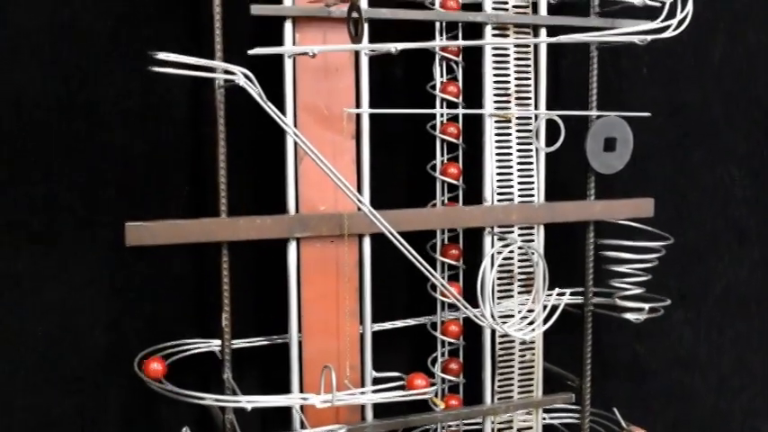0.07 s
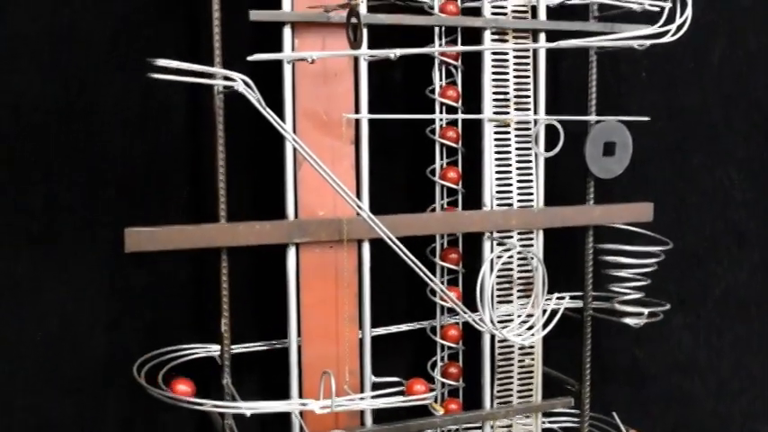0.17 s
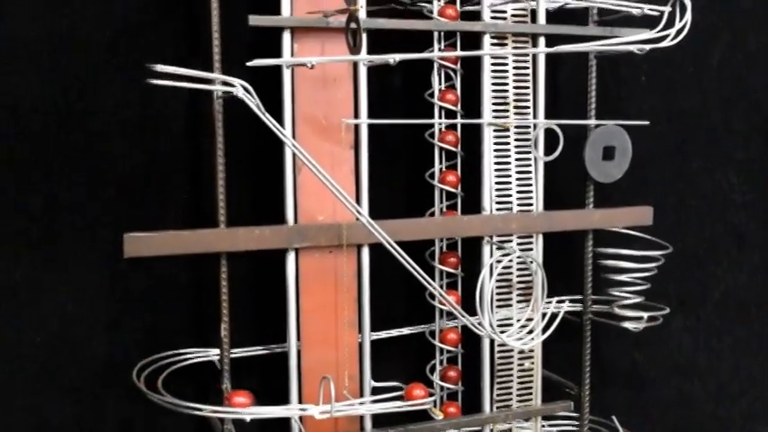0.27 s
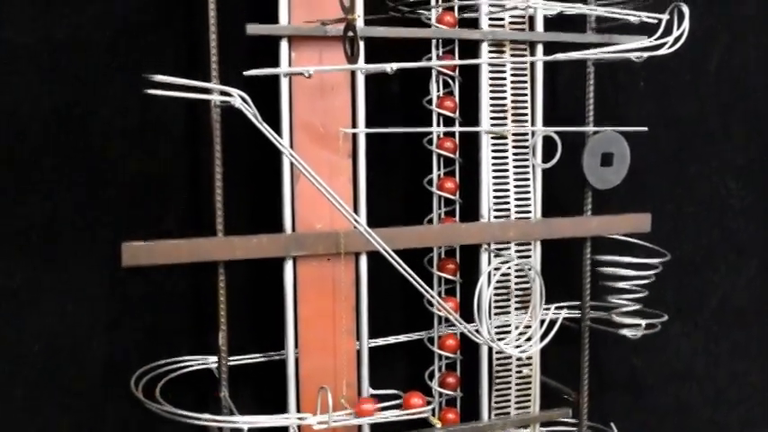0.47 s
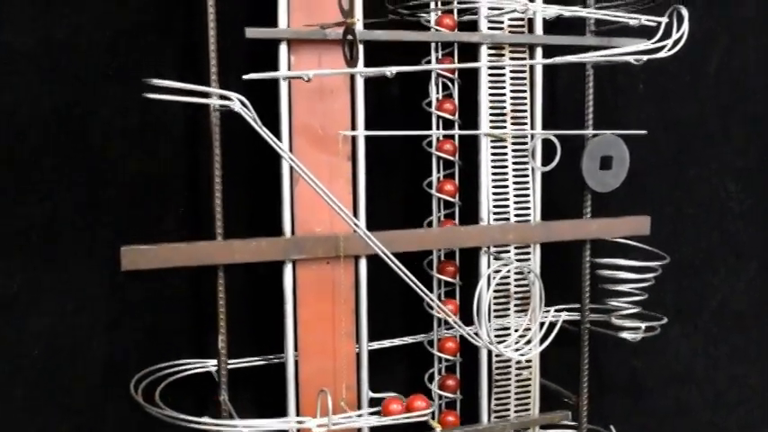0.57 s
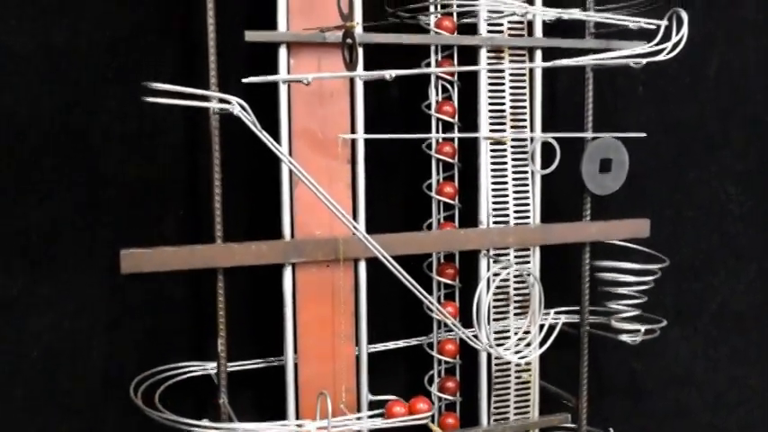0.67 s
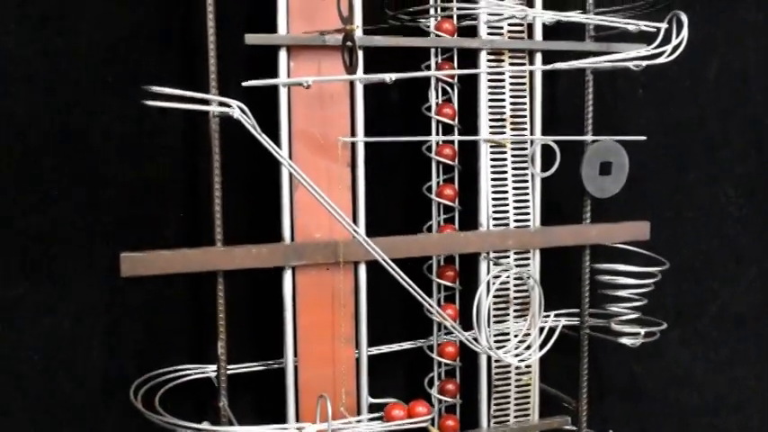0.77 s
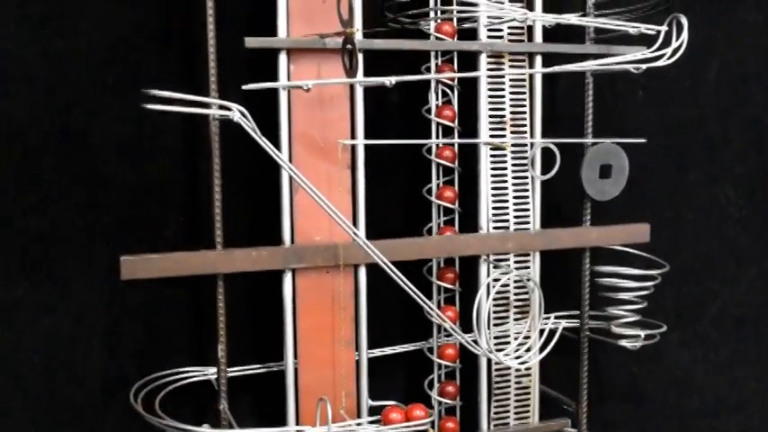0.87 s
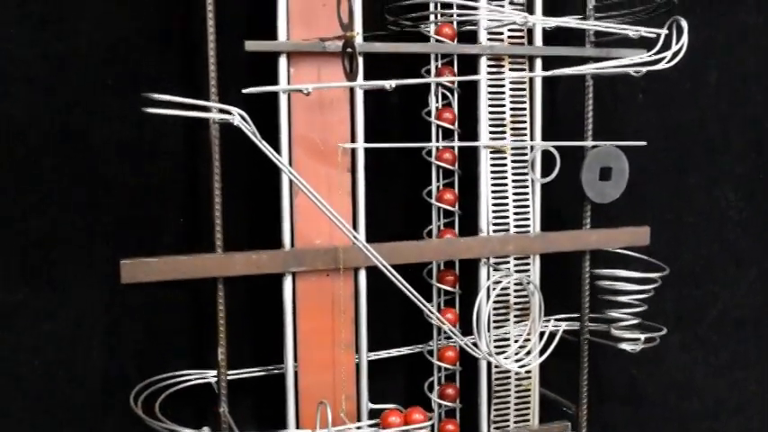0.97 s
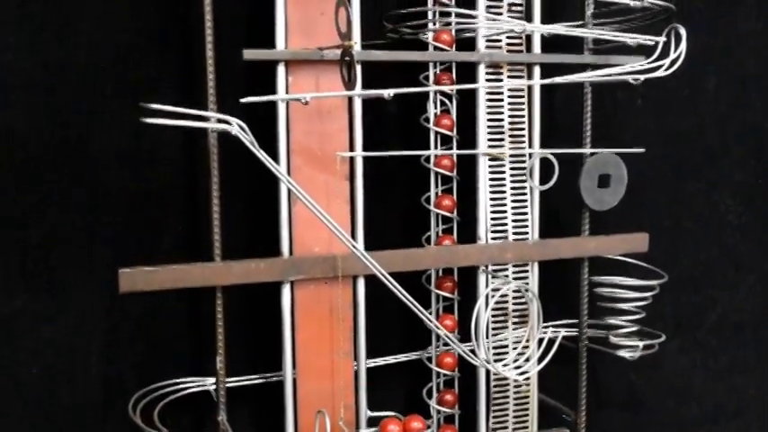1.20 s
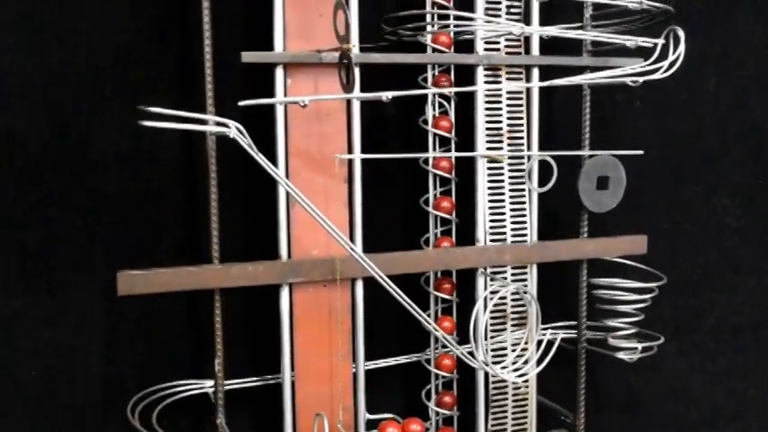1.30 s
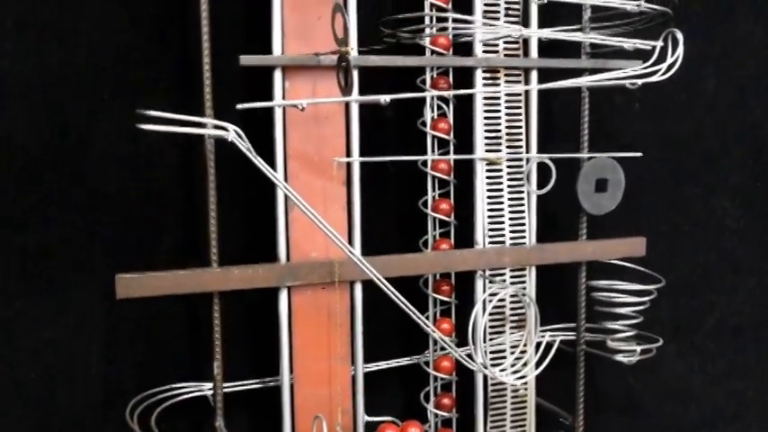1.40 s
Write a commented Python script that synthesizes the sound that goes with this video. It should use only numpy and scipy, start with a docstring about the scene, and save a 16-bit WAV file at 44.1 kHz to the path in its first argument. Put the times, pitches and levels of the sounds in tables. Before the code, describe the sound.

Small hard balls roll along metal wire tracks, clicking and knocking a ringing steel frame

```python
"""Beside a steel ball-run sculpture: small hard balls roll on wire tracks, knock the frame and click together.
Rolling is many tiny impacts and each knock is a jolt with a rattle. Both shake the same frame:
clear ringing rods over a dense wash of wire modes. The long lift coil hums in beats, swelling and fading.
The base thuds during the late, heavy knocking. A lift motor hums low under a faint hiss.
One microphone feeds both channels.
"""
import sys
import numpy as np
from scipy import signal
from scipy.fft import rfft, irfft, next_fast_len
from scipy.io import wavfile

SR = 44100
rng = np.random.default_rng(int(sys.argv[2]) if len(sys.argv) > 2 else 0)


def ratio(d):
    """dB to gain"""
    e = np.asarray(d, float) / 20
    return 10 ** e


def wrap_up_sound(samples):
    """Save the sound to the file named by the first command line argument, as 16-bit audio."""
    columns = np.atleast_2d(samples).T
    # keep every value between -1 and 1, then stretch to whole-number steps
    tamed = np.clip(columns, -1, 1)
    steps = np.round(tamed * 32767).astype(np.int16)
    wavfile.write(sys.argv[1], SR, steps)


N = 63945  # length of the scene in samples
RING = int(.9 * SR)  # length of every ring in samples

# Rolling contact on the wires: [t/s, level/dB, bright direct scrape relative to that level/dB]
ROLLING_LEVEL = [(0, -41.5, -31), (.09, -45.5, -1), (.11, -38, -5.5), (.22, -41.5, -31), (.3, -39, 4.5),
                 (.41, -41, -10), (.46, -45.5, 2), (.53, -37, -16), (.65, -38, -7), (.78, -38.5, -3.5),
                 (.86, -36.5, -1), (.915, -30.5, -7), (1.0, -35, -2), (1.122, -44, 3.5), (1.22, -48, 1),
                 (1.27, -50, -34), (1.45, -56.5, -12)]
# Colour of the wash under rolling: [f/Hz, relative level per Hz/dB]
ROLLING_COLOUR = [(150, -65), (250, -33), (465, -38.5), (691, -25), (1030, -5.5), (1330, -25),
                  (1820, -13.5), (1980, -10), (2750, -10), (9180, -12.5), (15400, -26)]
# Colour of the scrape heard directly: [f/Hz, relative level per Hz/dB]
SCRAPE_COLOUR = [(880, -51), (1500, -3), (2130, -15), (3080, -4), (5320, -2), (9190, -9.5), (15400, -17.5)]
TICKS_PER_S, TICK_SPREAD_DB = 2500, 3  # average rate of tiny impacts; spread of their sizes
ROLL_WASH_SHARE = 0.57  # rolling balls damp the wash: its t60 as a share of the free one

# Clear modes of the frame rods: [f/Hz, level/dB, t60/s]
ROD_MODES = [(897, -8, .7), (930, -8, .45), (962, -12, .3), (1005, -12, .3), (1039, -8, .4),
             (1152, -11, .9), (1435, -15, .35), (1760, -12, 1.0), (1786, -8, 1.1), (1812, -7, 1.1),
             (1840, -9, .7), (1868, -7, 1.1), (1934, -10, 1.1), (2075, -12, .9), (2117, -5, .75),
             (2300, -9, .7), (2568, -8, .85), (2640, -10, .9), (2715, -12, .4), (2790, -4, .3),
             (2825, -10, .4), (2960, -10, .5), (3386, -12, .8), (3960, -10, .45), (4480, -12, .4),
             (4893, -10, .4), (5237, -8, .45), (5375, -7, .3), (5446, -4, .5), (5889, -8, .35),
             (7130, -11, .4), (7846, -9, .4), (7988, -12, .45), (8203, -8, .3)]
# How long the wash of wire modes rings when free: [f/Hz, t60/s]
WASH_DECAY = [(300, 0.94), (1000, 0.36), (2500, 0.45), (5000, 0.36), (9000, 0.35), (15000, 0.16)]
RODS_KNOCK_DB, RODS_ROLL_DB = -44.5, -41.5  # gain of the rods beside a wash of energy 1
RODS_SCATTER_DB = 1  # random change of each rod mode from ring to ring
SPOT_OCTAVES, RODS_RISE_S = 0.079, 0.004  # reach of the struck spot among the rods; time the rods take to fill
# Each ring wavers at random in level and phase: typical size in level; new values per second
WAVER_DB, WAVER_PER_S = 4, 30

# Lift motor and room hum: [f/Hz, relative level per Hz/dB]
HUM_COLOUR = [(12, -34), (20, -4.5), (65, -8), (107, 2), (226, -7), (257, -7), (297, -16), (375, -8),
              (422, -24), (450, -8), (580, -25), (990, -120)]
# The hum swells and sags: [t/s, change of level/dB]
HUM_CHANGES = [(0, 1.5), (.15, -0.5), (.3, 3), (.42, 1), (.6, -1), (.75, 1.5), (.9, -3), (1.05, 1.5),
               (1.25, 2), (1.45, 0)]
HUM_DB = -56  # before the swell

# Room air and preamp hiss: [f/Hz, relative level per Hz/dB]
HISS_COLOUR = [(240, -58), (400, -11), (927, -1.5), (1660, -5.5), (1840, -6), (2210, -1.5), (2780, -3.5),
               (15400, -30.5)]
HISS_DB = -50

# Evenly spaced modes of the long lift coil: [f/Hz, relative level/dB]
COIL_MODES = [(1760, -5), (1786, 0), (1812, -5)]
# The coil's hum swells and fades: [t/s, level/dB]
COIL_LEVEL = [(.24, -49.5), (.28, -42), (.34, -38), (.45, -41.5), (.55, -45.5), (.63, -39), (.72, -43),
              (.8, -45), (.9, -62), (1.0, -66), (1.1, -90)]
COIL_IN_STEP_S = .2177  # moment when all coil modes cross zero together

# A ball knocks the frame: [t/s, relative level/dB, rattle t60/s, brightness/dB per octave,
# f of the rods nearest the spot/Hz, gain of those rods/dB]
FRAME_KNOCKS = [(.2252, -28.5, 0.073, -0.5, 5190, 14), (.232, -40, 0.12, -1.5, 920, 14),
                (.248, -50.5, 0.018, -0.5, 2117, 17), (.262, -33, 0.24, 0.5, 1039, 17),
                (.335, -34.5, 0.026, -0.5, 907, 8.5), (0.424, -36.5, 0.14, -2.5, 4480, 4),
                (.46, -46.5, 0.034, 0, 5446, 17), (0.56, -34, 0.038, 3.5, 1435, 25.5),
                (0.5678, -35, 0.11, -1.5, 1039, 13), (.575, -29.5, 0.037, 2.5, 2780, 18.5),
                (0.586, -49, 0.059, -3.5, 4893, 8), (.67, -42.5, 0.041, 0, 5446, 23.5),
                (.77, -44, 0.069, -2.5, 2825, 21), (0.9219, -21, 0.042, 1.9, 967, 10.5),
                (.936, -24, 0.04, 2, 7980, 14.5), (.965, -26, 0.058, -1.5, 2830, 16),
                (.99, -35, 0.025, 0, 8150, 24), (1.02, -36, 0.074, 1, 2117, 16),
                (1.04, -39, .06, -4.5, 1900, 14.5), (1.07, -44, 0.026, -5.5, 2513, 22.5),
                (1.189, -50.5, .05, -6, 7860, 27)]
# Colour of the wash under a knock: [f/Hz, relative level per Hz/dB]
KNOCK_WASH_COLOUR = [(150, -66), (250, -32), (613, -13), (703, -15), (911, -8.5), (1670, -11.5), (2750, -1),
                     (3560, -5.5), (5290, -1), (13400, -5.5), (15400, -7.5)]

# Ball clicks on ball: [t/s, peak level/dB]
BALL_CLICKS = [(.2253, -14), (.5541, -16), (.5547, -8), (.5611, -31), (.9227, -6)]
# The ball's own short ring: [f/Hz, relative level/dB, t60/s]
BALL_MODES = [(5800, -3, .004), (8200, -2, .004), (11000, -1, .004), (13800, -4, .003)]

# The base board thuds during the late, heavy knocking: [t/s, peak level/dB]
BASE_THUDS = [(.924, -35.5), (.96, -42), (1.03, -40)]
# Modes of the base board: [f/Hz, relative level/dB, t60/s]
BOARD_MODES = [(169, -5.5, 0.27), (359, -7, 0.12), (472.4, -3, 0.23), (554, 2, 0.12), (660, -3.5, 0.22)]


def unit(x):
    """Scale to rms 1."""
    return x / np.sqrt(np.mean(x ** 2) + 1e-20)


def along(points, hz):
    """Read a value between (f/Hz, value) points on a log frequency axis."""
    f, value = np.transpose(points)
    return np.interp(np.log(hz + 1), np.log(f + 1), value)


def filtered(x, response):
    """Multiply the spectrum of x by a response that depends on frequency."""
    size = next_fast_len(len(x) + 8192)  # spare room for the filter's tail
    spectrum = rfft(x, size) * response(np.fft.rfftfreq(size, 1 / SR))
    return irfft(spectrum, size)[:len(x)]


def coloured(x, colour):
    """Filter x by a colour table."""
    return filtered(x, lambda f: ratio(along(colour, f)))


def ring(modes, scatter_db, spot_hz=1000, spot_db=0, rise=1e-5):
    """Damped, wavering sines at slightly random levels; modes near the struck spot get spot_db more."""
    t = np.arange(RING) / SR
    hz, db, t60 = np.transpose(modes)[:, :, None]
    nearness = np.exp(-(np.log2(hz / spot_hz) / SPOT_OCTAVES) ** 2)
    db = db + scatter_db * rng.standard_normal(db.shape) + spot_db * nearness
    knots = np.arange(WAVER_PER_S + 1) / WAVER_PER_S
    fade_in = np.minimum(knots * WAVER_PER_S, 1)  # no waver at the strike itself
    draws = rng.standard_normal((len(modes), len(knots)))
    waver = np.array([np.interp(t, knots, draw * fade_in) for draw in draws])
    level = ratio(db + WAVER_DB * waver - 60 * t / t60)
    sines = np.sin(2 * np.pi * hz * t + waver / 2)  # the phase wavers too
    return np.sum(level * sines, axis=0) * (1 - np.exp(-t / rise))


def frame(colour, rods_db, share=1, tilt_db=0, spot_hz=1000, spot_db=0):
    """The frame's answer to one impulse: rod modes over a wash (energy 1) of countless wire modes."""
    def tilt(f):
        return ratio(tilt_db * np.log2((f + 100) / 4000))

    # the wash is noise that dies away at its own speed in each frequency band
    hz, t, bands = signal.stft(rng.standard_normal(RING), SR, nperseg=256)
    bands = bands * ratio(-60 * t / (share * along(WASH_DECAY, hz)[:, None]))
    wash = signal.istft(bands, SR, nperseg=256)[1][:RING]
    wash = filtered(coloured(wash, colour), tilt)
    rods = filtered(ring(ROD_MODES, RODS_SCATTER_DB, spot_hz, spot_db, RODS_RISE_S), tilt)
    return unit(wash) / np.sqrt(RING) + ratio(rods_db) * rods


def struck(events, modes, rise):
    """Rings of one object, each scaled to its peak level at its moment."""
    out = np.zeros(N + RING)
    for s, db in events:
        strike = ring(modes, scatter_db=1.5, rise=rise)
        out[round(s * SR):][:RING] += ratio(db) * strike / np.abs(strike).max()
    return out[:N]


def rolling():
    """Dense tiny impacts of uneven size drive the frame and are also heard directly as a scrape."""
    length = N + RING  # starts early so the frame already rings at time 0
    t = (np.arange(length) - RING) / SR
    hit = rng.random(length) < TICKS_PER_S / SR
    size_db = TICK_SPREAD_DB * rng.exponential(size=length).clip(0, 3)
    ticks = unit(hit * rng.choice([-1, 1], length) * ratio(size_db))
    s, db, scrape_db = np.transpose(ROLLING_LEVEL)
    push = ticks * ratio(np.interp(t, s, db))
    body = signal.fftconvolve(push, frame(ROLLING_COLOUR, RODS_ROLL_DB, share=ROLL_WASH_SHARE))[:length]
    scrape = ratio(np.interp(t, s, db + scrape_db)) * unit(coloured(ticks, SCRAPE_COLOUR))
    return (body + scrape)[RING:]


def motor_hum():
    """Low lift motor and room hum: coloured noise that swells and sags."""
    s, change_db = np.transpose(HUM_CHANGES)
    level_db = HUM_DB + np.interp(np.arange(N) / SR, s, change_db)
    return ratio(level_db) * unit(coloured(rng.standard_normal(N), HUM_COLOUR))


def hiss():
    """Faint steady hiss of room air and preamp: coloured noise."""
    return ratio(HISS_DB) * unit(coloured(rng.standard_normal(N), HISS_COLOUR))


def coil():
    """The lift coil hums, swelling and fading; its close, evenly spaced modes beat in even pulses."""
    t = np.arange(N) / SR
    s, db = np.transpose(COIL_LEVEL)
    tones = np.zeros(N)
    for hz, mode_db in COIL_MODES:
        tones += ratio(mode_db) * np.sin(2 * np.pi * hz * (t - COIL_IN_STEP_S))
    return ratio(np.interp(t, s, db)) * unit(tones)


def knocks():
    """Each knock is a jolt and a short rattle of the ball, ringing the frame anew."""
    out = np.zeros(N + 2 * RING)
    t = np.arange(SR // 5) / SR
    for s, db, rattle_t60, tilt_db, spot_hz, spot_db in FRAME_KNOCKS:
        # cubed noise is spiky, like a rattle
        push = rng.standard_normal(len(t)) ** 3 * .13 * ratio(-60 * t / rattle_t60)
        push[0] = 1  # the jolt
        body = frame(KNOCK_WASH_COLOUR, RODS_KNOCK_DB, tilt_db=tilt_db, spot_hz=spot_hz, spot_db=spot_db)
        sound = signal.fftconvolve(push / np.linalg.norm(push), body)
        out[round(s * SR):][:len(sound)] += ratio(db) * np.sqrt(SR / 20) * sound
    return out[:N]


def clicks():
    """Glassy ticks of ball on ball: high modes that die within milliseconds."""
    return struck(BALL_CLICKS, BALL_MODES, rise=1e-5)


def thuds():
    """Dull thuds of the base board: low modes with a softer start."""
    return struck(BASE_THUDS, BOARD_MODES, rise=0.0031)


def scene():
    """Add all sounds at one microphone and copy it to both channels."""
    mix = rolling() + motor_hum() + hiss() + coil() + knocks() + clicks() + thuds()
    return np.tile(mix, (2, 1))


def roll_off(x):
    """The treble ends steeply here."""
    return signal.sosfilt(signal.butter(12, 16500, fs=SR, output="sos"), x)


def record(dry):
    """Cut everything from 15450 Hz up and finish the mix."""
    mix = np.array([filtered(channel, lambda f: f < 15450) for channel in dry])
    return roll_off(mix)


dry = scene()
out = record(dry)
wrap_up_sound(out)
```